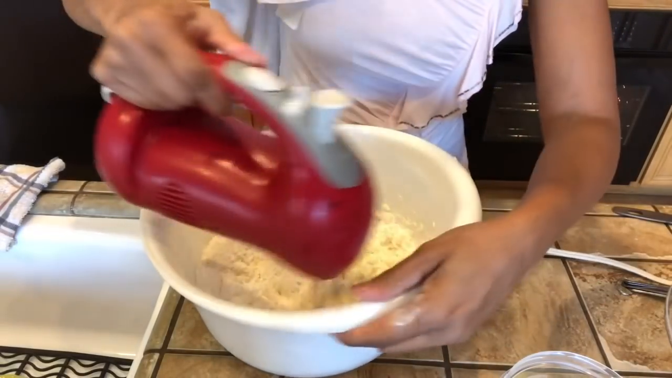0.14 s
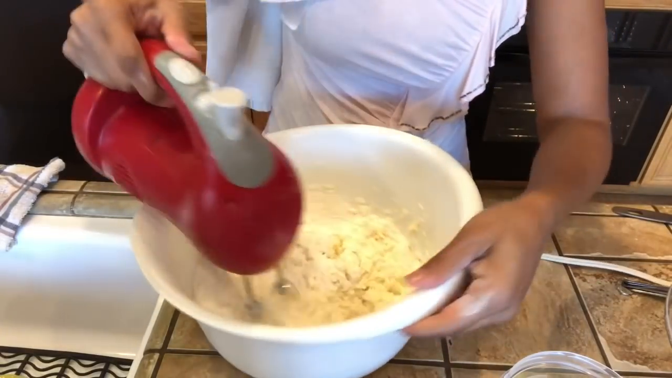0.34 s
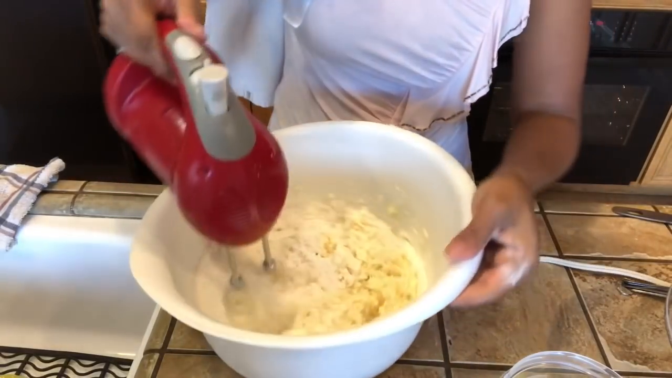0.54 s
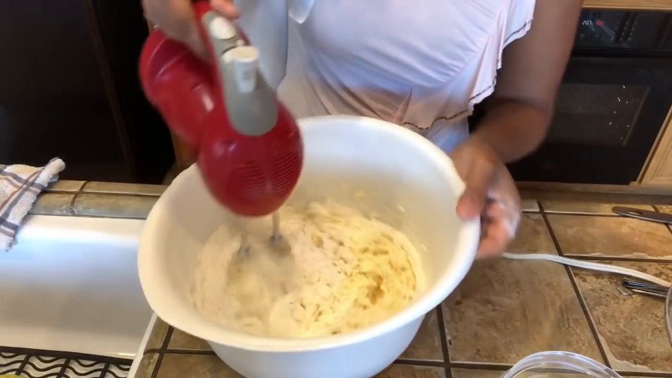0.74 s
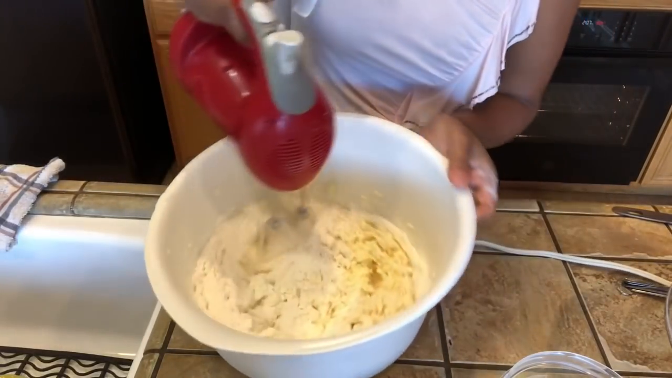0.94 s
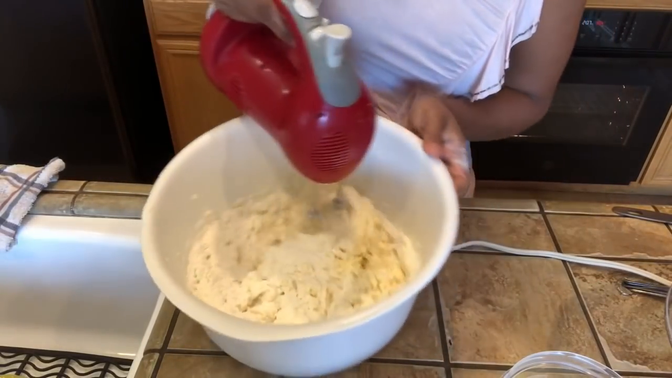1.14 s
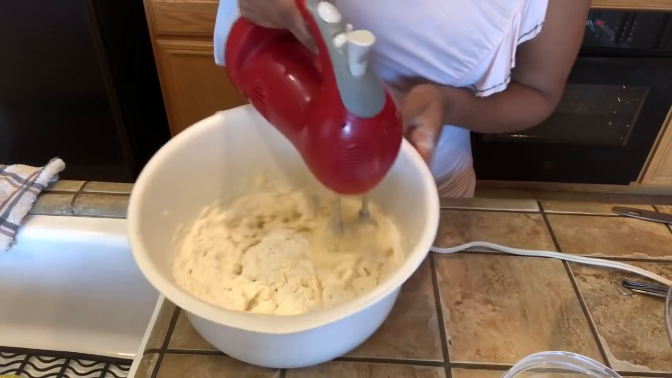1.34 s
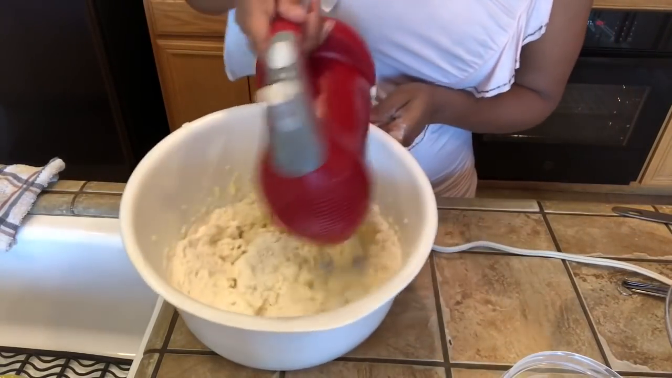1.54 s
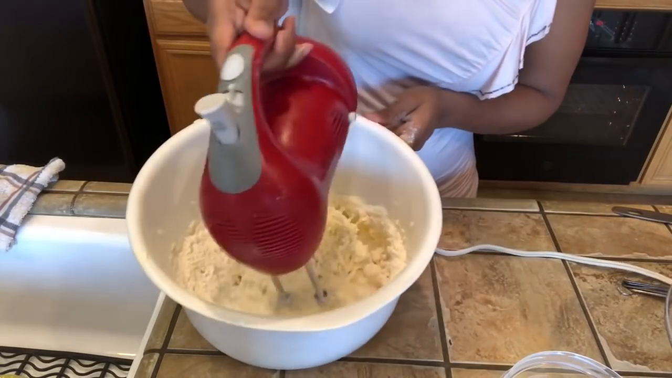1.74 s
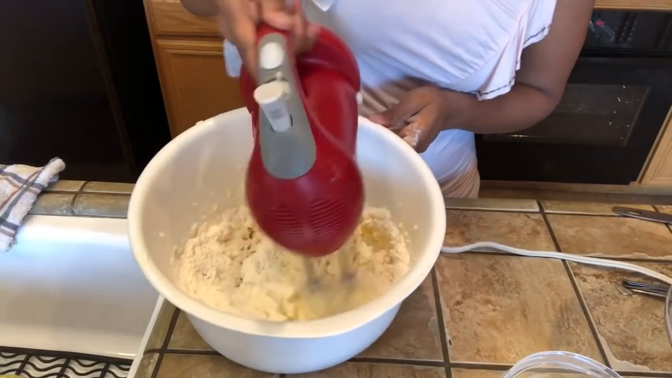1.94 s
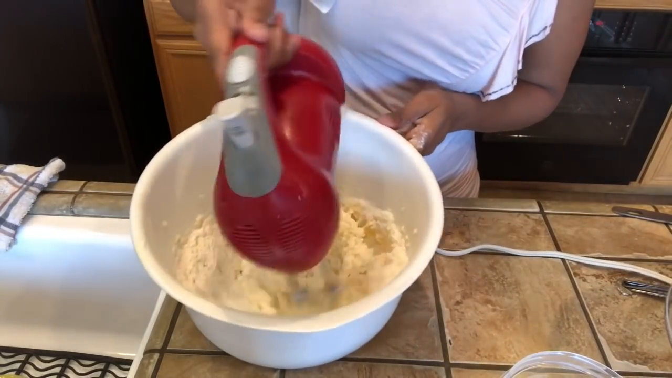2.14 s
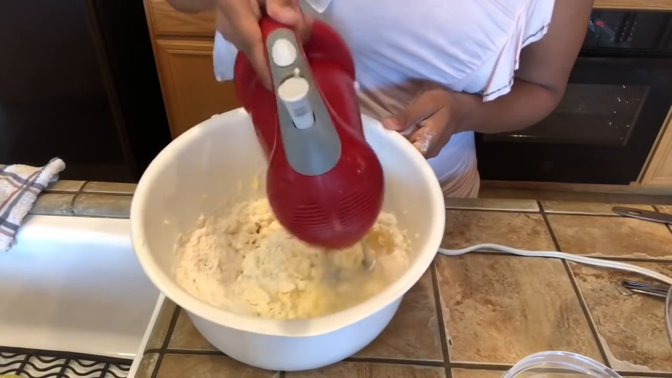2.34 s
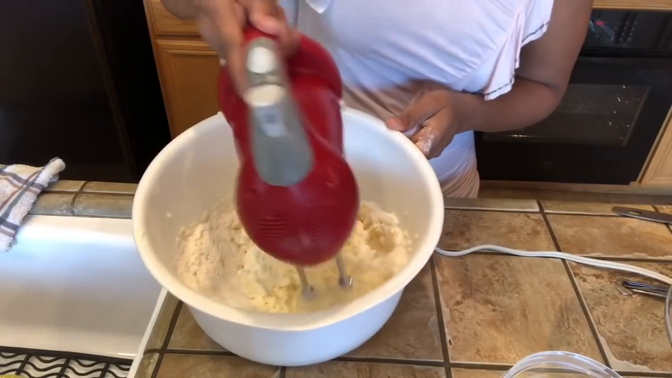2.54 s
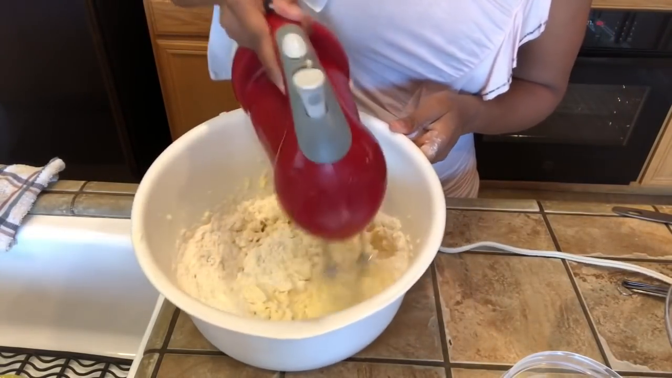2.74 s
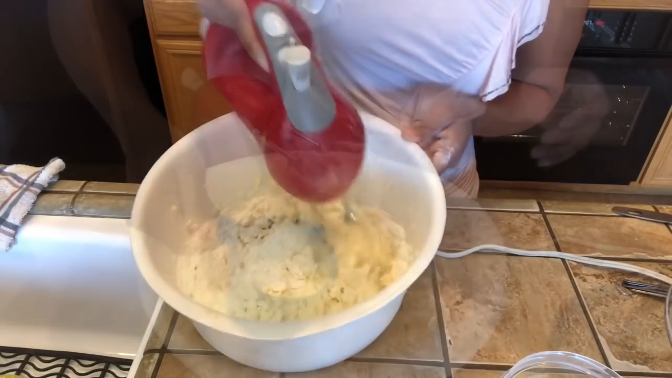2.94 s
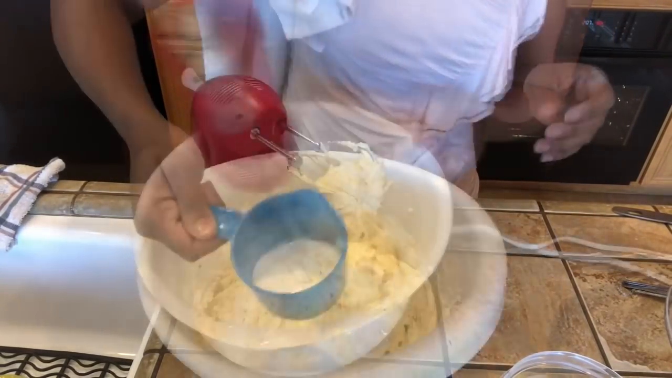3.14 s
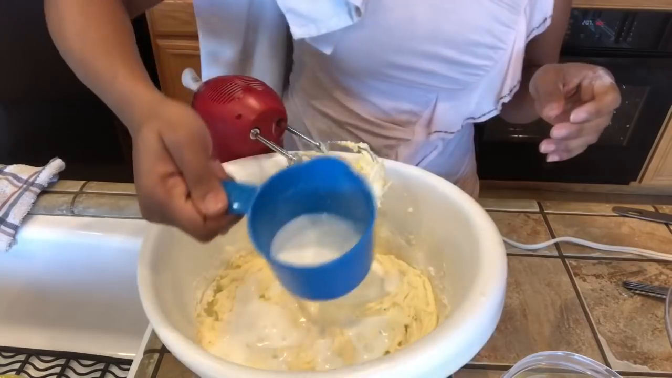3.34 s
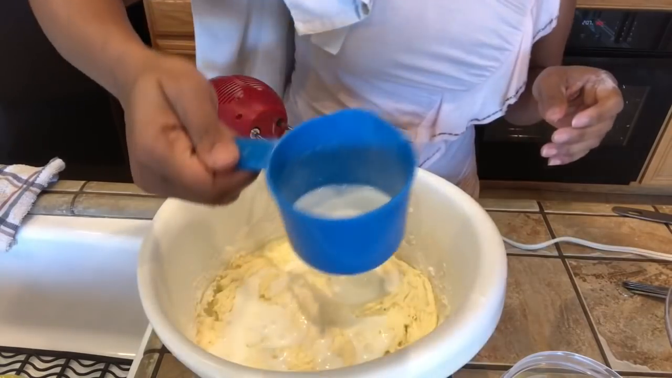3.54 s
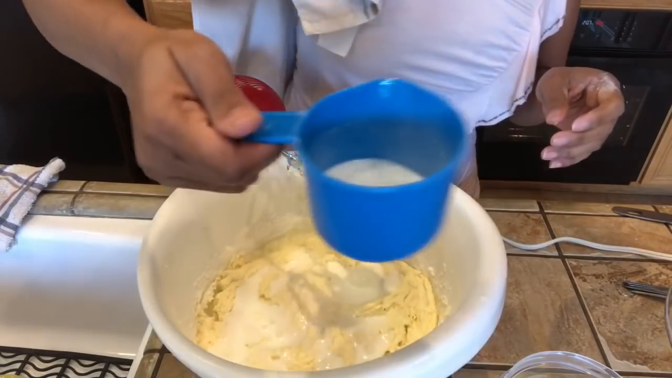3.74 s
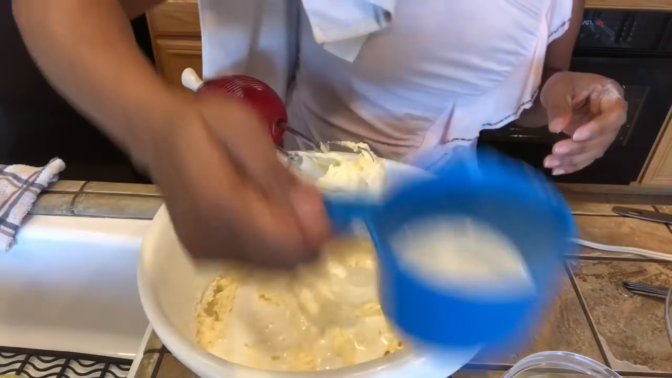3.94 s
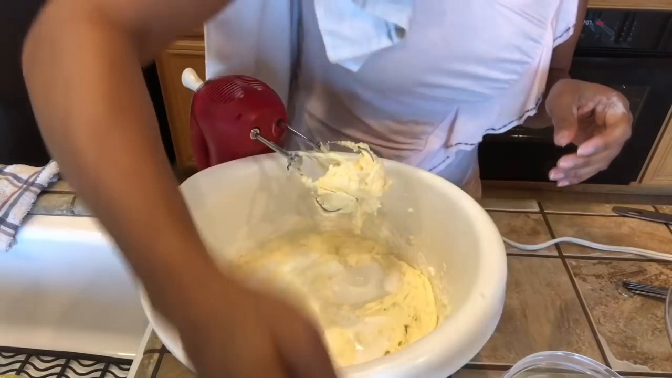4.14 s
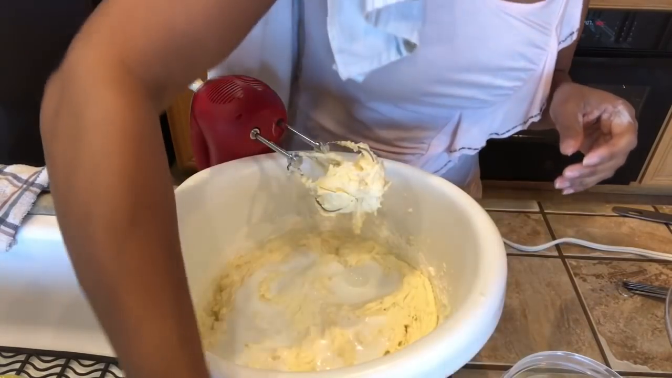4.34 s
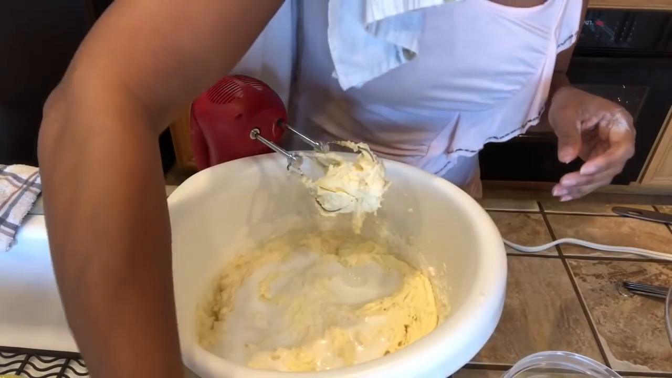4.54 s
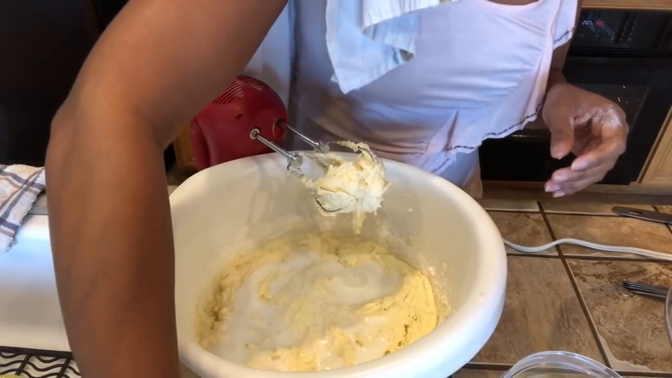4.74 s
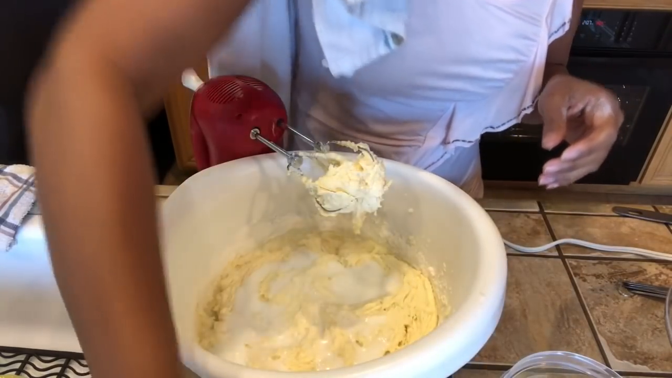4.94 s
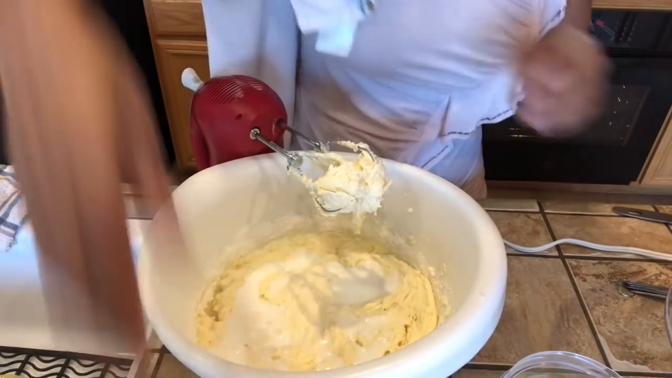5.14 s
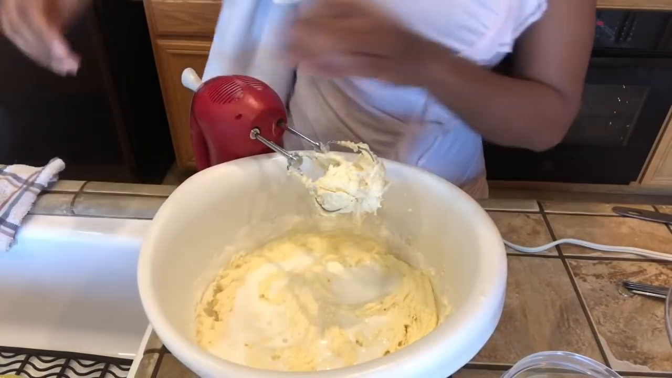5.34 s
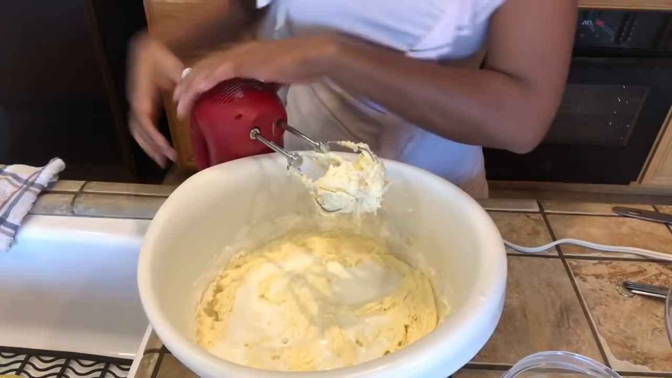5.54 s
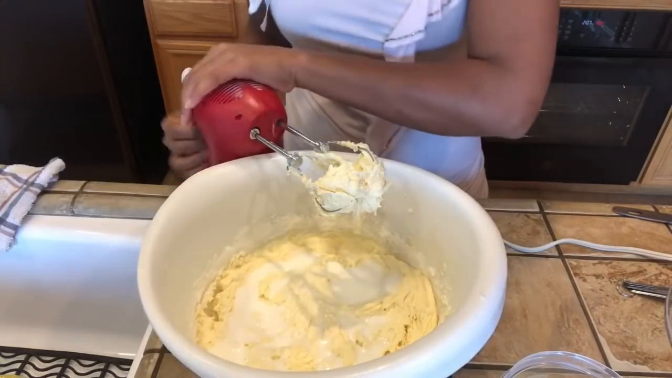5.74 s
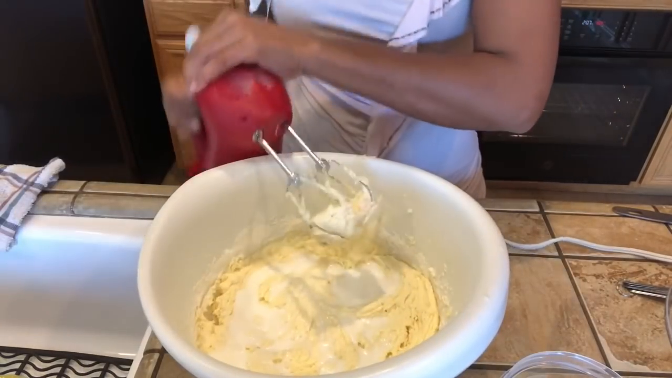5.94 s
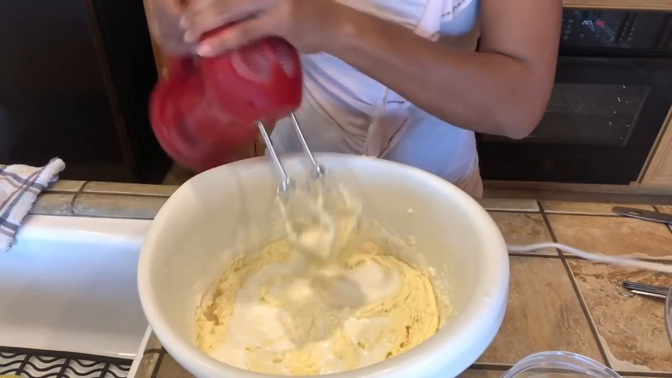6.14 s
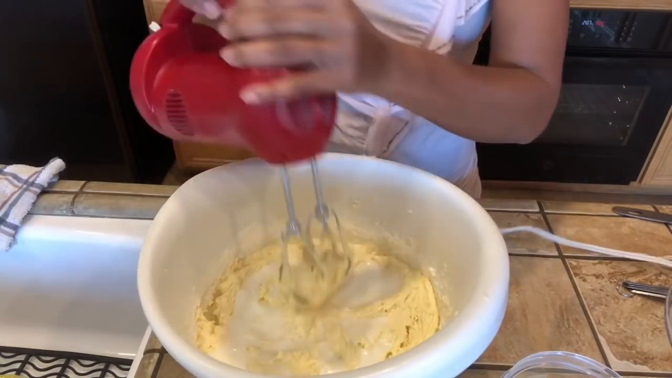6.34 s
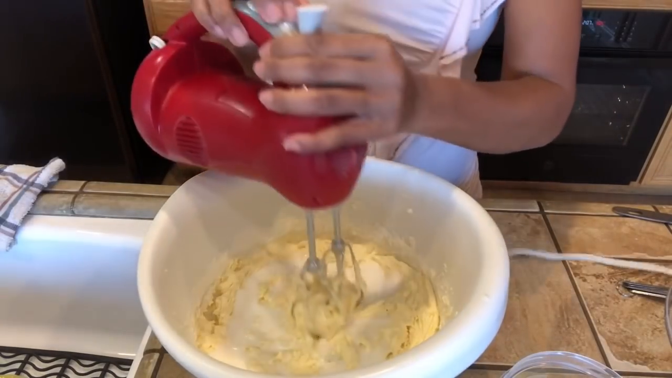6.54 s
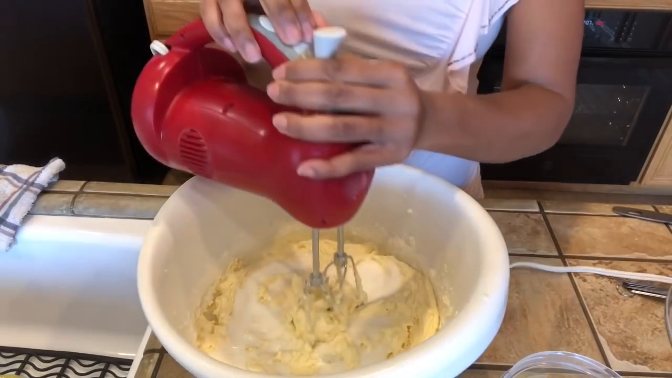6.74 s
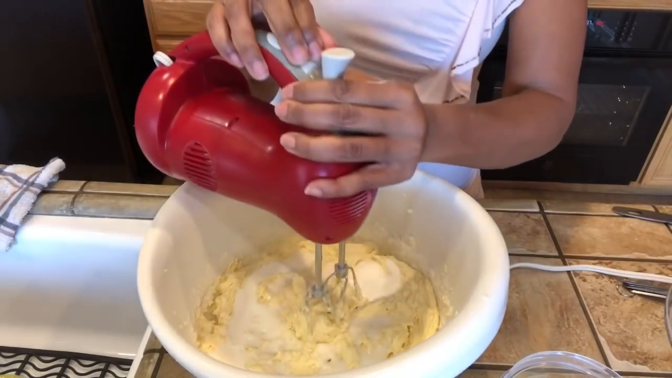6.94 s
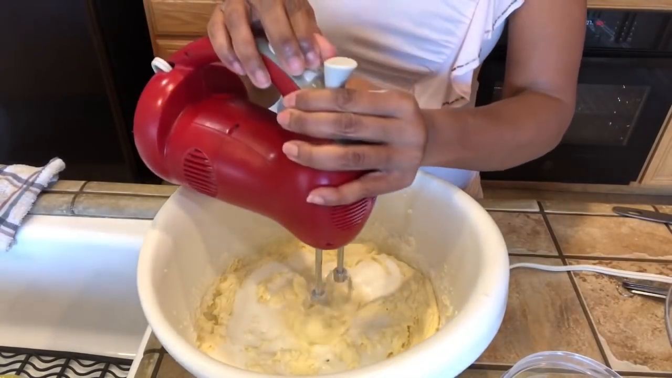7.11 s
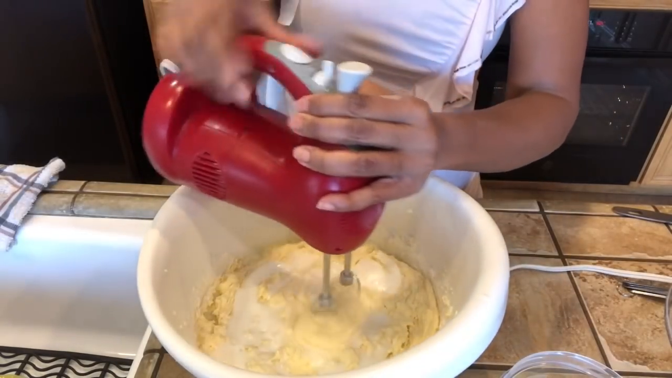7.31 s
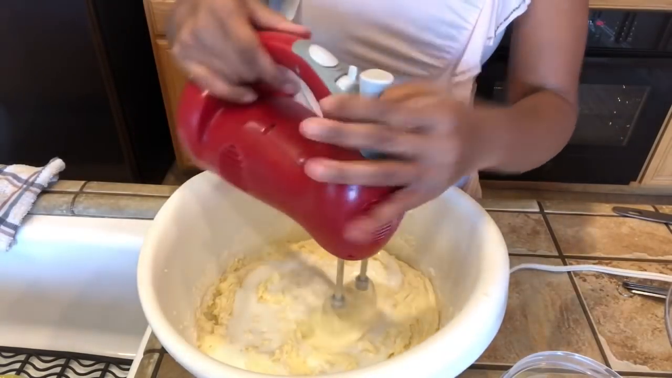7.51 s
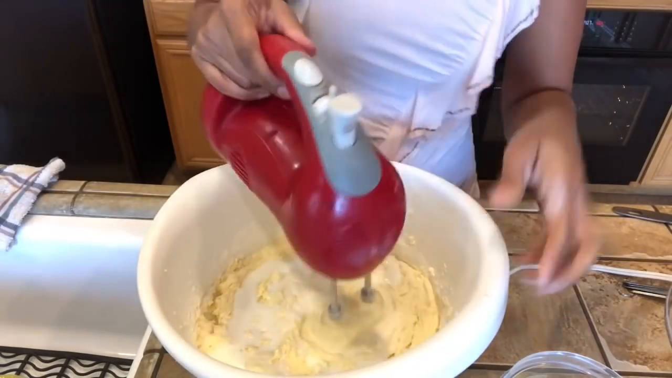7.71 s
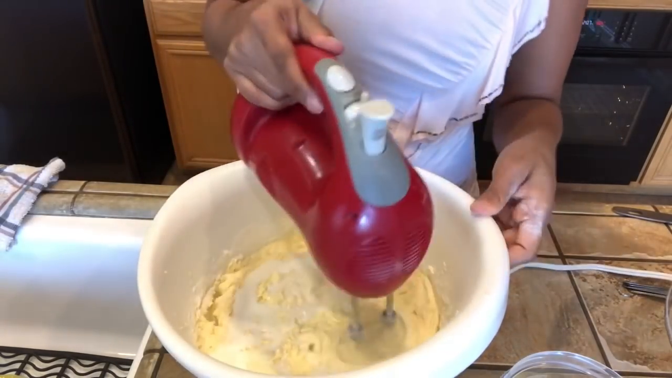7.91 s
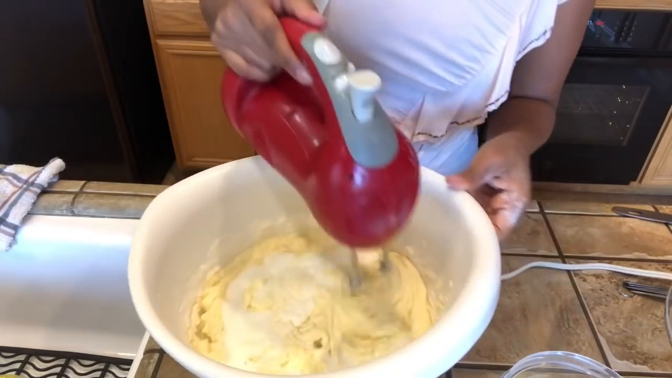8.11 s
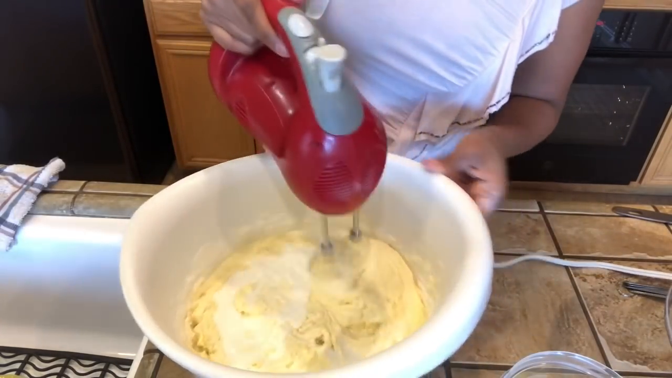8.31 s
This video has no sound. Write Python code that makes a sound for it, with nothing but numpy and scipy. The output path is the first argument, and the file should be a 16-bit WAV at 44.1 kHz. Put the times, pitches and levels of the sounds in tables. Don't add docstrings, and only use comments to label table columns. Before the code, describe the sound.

An electric hand mixer whines and buzzes through batter, knocks the bowl and fades; after small taps it switches on and revs up again.

```python
import sys
import numpy as np
from scipy import signal
from scipy.fft import rfft, irfft
from scipy.io import wavfile
from scipy.ndimage import uniform_filter1d

SR = 44100
rng = np.random.default_rng(int(sys.argv[2]) if len(sys.argv) > 2 else 0)


def convert_level_to_amplitude(level_db):
    exponent = np.asarray(level_db, float) / 20
    return 10 ** exponent


def int16_out(signal):
    q = np.round(np.clip(np.atleast_2d(signal).T, -1, 1) * 32767)
    wavfile.write(sys.argv[1], SR, q.astype(np.int16))


N = 369116
TIME = np.arange(N) / SR
HZ = np.arange(N // 2 + 1) * SR / N

# (frequency [Hz], level [dB per Hz])
ROOM_AIR = [(25, -28), (45, -2), (70, 1), (150, 4), (250, 4), (500, 1), (1000, -6), (2000, -12),
            (4000, -15), (7800, -19), (8300, -23.5), (12000, -25.5), (15500, -28)]
# (frequency [Hz], level [dB rms])
FRIDGE_HUM = [(118.6, -52.5), (241, -60.5), (360, -57.5), (511, -65), (1050, -67)]
ROOM_AIR_DB = -50.5
ROOM_T60_S, ROOM_DB = 0.71, -20

MAINS_HZ = 60.0
SLOT = 6
# (first run [s], second run [s])
PUSH_S = (.004, .0058)
SHELL_TILT = (.5, .15)
IDLE_EFFORT = (.17, .36)
LEAN = (.2, .06)
SLOT_ORDERS = (3, 9, 12, 15, 16, 18, 24, 28)
# (level [dB re fan], ..)
SLOT_LEVELS = [-2, -9, -5, -17, -12, -4.5, -6.5, -14]
# (order [shaft multiple], level [dB re shaft tone])
FAN_ORDERS = [(2, -12), (3, -15), (4, -13), (7, -11), (8, -21), (9, -17), (12, -15), (16, -16), (21, -22),
              (34, -27)]
# (order [mains multiple], level [dB re fan])
MAINS_BUZZ = [(1, -28), (2, -24.5), (3, -23.5), (4, -20.5), (5, -23), (7, -30), (8, -12), (12, -37)]
# (frequency [Hz], width [Hz], level [dB])
SHELL_MODES = [(977, 43, 14), (1432, 38, 10.5), (2304, 66, 17), (3050, 45, 6), (4140, 720, -2.5),
               (7540, 100, -5), (12050, 1000, 9.5)]
# (frequency [Hz], level [dB per Hz])
CHURN_NOISE = [(18, -63), (30, -2), (108, -12.5), (300, -7.5), (361, -5.5), (411, 0.5), (625, -6),
               (926, -3), (1270, -5), (1880, -5), (2250, -2.5), (2550, -3.5), (2780, -5.5), (3100, -6),
               (4340, -9.5), (12000, -27), (15600, -32.5)]
# (frequency [Hz], half width [Hz], level [dB])
VENT_SLOTS = [(3110, 110, -20.5), (4350, 290, -10.5), (7500, 200, -16), (12300, 300, -24)]

# (time [s], nearness [dB], vent turned to the microphone [dB], shell shake [dB])
STIRRING_PATH = [(0, -27, 5.5, 1), (.22, -26.5, 6, -2), (.38, -27, 6.5, 0), (.46, -28, 0.5, 1.5),
                 (.7, -28.5, 1, 0), (.95, -29.5, 5, -1.5), (1.2, -29, 6.5, 2.5), (1.44, -30, 0.5, -3.5),
                 (1.6, -29.5, -3, 1), (1.86, -29.5, 1, -5), (2.02, -29.5, 3, 4.5), (2.241, -29.5, 0.5, 1.5),
                 (2.52, -27.5, 7.5, 4), (2.709, -28.5, 1, -1.5), (2.809, -28, 4.5, 5),
                 (2.93, -27.5, 4.5, 3), (3.06, -28.5, 6, 4), (3.3, -28, -3.5, 2.5)]
# (time [s], shaft speed [Hz])
STIRRING_SPEED = [(0, 366), (.07, 363.8), (.22, 364.8), (.44, 361.3), (.66, 366), (.77, 363.8), (.92, 368),
                  (1.35, 355), (1.45, 348.5), (1.66, 347.8), (1.79, 342.5), (2.04, 358.5), (2.23, 352.3),
                  (2.51, 370.5), (2.68, 361.3), (2.89, 366.2), (3.1, 360.5), (3.36, 356.5)]
STIRRING_LAYERS = {"top": -5.5, "gears": -1.02, "bowl": -2.5, "shaft": -4.5}
# (start [s], end [s])
FADE_S = (2.743, 3.329)
FREE_HZ, SHAKE_DB_PER_HZ, DIG_DB_PER_HZ = 362.6, 0.2628, 0.23
THROB = 0.054
SCRAPE_S, SCRAPE_SHARE = 0.026, 0.36

# (middle [s], half length [s], pitch [Hz], level [dB])
DRAG_SWELLS = [(.1, .03, 1650, -32), (.27, .04, 1650, -34), (1.49, 0.021, 1750, -30),
               (1.727, .03, 1650, -29), (1.857, .035, 1600, -29.5), (1.4, 0.023, 500, -33),
               (2.103, 0.027, 1550, -30.5), (2.18, 0.028, 520, -24), (2.622, 0.052, 1520, -30),
               (2.617, .03, 780, -32), (7.56, 0.021, 340, -30), (1.13, 0.48, 100, -48.5),
               (2.8, .07, 70, -48), (7.35, .15, 75, -53), (8.12, .08, 520, -34.5), (7.115, .06, 492, -29),
               (7.747, .03, 1850, -33), (7.72, .22, 980, -32), (1.65, .2, 2120, -33), (5.86, .05, 65, -52),
               (.035, .012, 900, -27), (.095, .012, 2700, -27)]
# (low groans of the bowl [Hz], high wires [Hz])
DRAG_WIDTH_HZ = (45, 230)
# (time [s], peak [dB], ring [Hz], crack [dB re peak], scrape [dB])
BOWL_BUMPS = [(0.113, -10, 380, 1, -2.5), (.175, -23, 400, 5, -2), (.226, -22, 440, 14, 0.5),
              (.338, -24, 400, 0, 1), (0.567, -33, 400, 5, 1), (1.103, -24.5, 360, -14, -0.5),
              (1.19, -10.5, 360, -17, 3), (1.286, -22, 400, 0, 3.5), (1.389, -19, 526, -10, 6),
              (1.49, -16, 351, -16, 0.5), (1.509, -19, 900, -14, 6), (1.618, -16, 347, 1.5, 3),
              (1.708, -17.5, 347, 5, 7.5), (1.842, -11, 507, -4, 3), (2.1, -31, 355.3, -14, 6),
              (2.164, -12, 513, 1, 6), (2.183, -17, 355, -12, 4.5), (2.222, -24, 400, 7, 2),
              (2.308, -21, 350, -12, 1), (2.436, -20, 400, 4, 0), (2.52, -14, 366, -3, 1.5),
              (7.555, -15, 416, -17, 1), (8.197, -16, 433, -3, -1.5), (8.32, -22, 400, -8, 2.5)]
# (time [s], peak [dB], first pitch [Hz], last pitch [Hz], cup ring [dB re peak])
BOWL_BLOWS = [
    (2.7463, 0, 1650, 300, -30),
    (2.7545, -24, 240, 140, -40),
]
CHIRP_CYCLES = 4.8

# (middle [s], half length [s], hiss [dB], body [dB])
HAND_STROKES = [(3.806, 0.23, -70, -45), (5.554, 0.036, -49, -58), (5.667, 0.094, -49.5, -48),
                (5.782, 0.05, -53, -34.5), (6.12, 0.044, -60, -46), (6.203, .05, -52, -58),
                (6.45, 0.19, -59, -45.5), (6.61, 0.015, -49, -54), (6.684, 0.044, -64, -45),
                (6.8, 0.1, -64, -55), (6.983, 0.032, -62, -37)]
# (time [s], peak [dB], first pitch [Hz], last pitch [Hz], cup ring [dB re peak])
CUP_BLOWS = [
    (4.5296, -14, 1450, 500, -3),
    (4.645, -27, 1450, 600, -8),
    (4.7615, -25.5, 1400, 850, -3),
    (4.771, -34, 1300, 1200, 0),
    (4.78, -36, 560, 420, -30),
    (5.80, -45, 200, 80, -40),
]
# (frequency [Hz], level [dB re blow], t60 [s])
CUP_MODES = [(2100, -14, 0.011), (3160, -18.5, 0.022), (5000, -25, .02), (1239, -9, 0.059)]
# (time [s], peak [dB], pitch [Hz], t60 [s])
SMALL_PINGS = [(5.708, -42, 200, .03), (5.723, -39, 520, .03), (5.765, -35, 3380, .03),
               (5.775, -34, 380, .03), (5.778, -55, 3400, .2), (4.557, -38, 1250, .03),
               (4.542, -33, 560, .04)]
# (time [s], peak [dB], upper ring [dB re peak], crack [dB re peak])
FINGER_TICKS = [(4.797, -44, -16, -2), (5.718, -43, -10, -3), (5.767, -28.5, -20, -9), (6.051, -47, 7, 1),
                (6.092, -27.5, -4, -21), (6.2333, -32.5, -19, -15), (6.41, -44, -15, -12),
                (6.444, -49, -7, -7), (6.474, -46, -3, -6), (6.501, -44, -9, -4.5), (6.579, -54, -2, 3),
                (6.607, -48, -8, 14), (6.621, -49, -10, 1), (6.632, -55, -5, 12), (6.664, -42, 0, -10),
                (6.685, -52, 3, 6), (6.702, -46, 6, -6), (6.715, -38, 1, -7), (6.742, -34.5, 0, -13),
                (6.766, -36, -1, -12), (6.785, -38, -1, -12), (6.807, -34.5, -2, -15), (6.86, -35, 5, -11),
                (6.887, -43, 1, -7), (6.899, -42, -3, -6), (6.961, -38, 6, -6), (6.975, -42, 5, -4),
                (6.994, -35, 6, -11), (6.987, -29, 0, -3), (7.002, -17.5, 0, -6)]
# (time [s], peak [dB], ring [Hz], upper ring [dB], crack [Hz], crack [dB])
FINGERNAIL = (6.655, -47, 850, 0, 10300, 8)

SWITCH_ON_S, TOP_HZ = 7.001, 340
# (time [s], shaft speed [Hz])
SPIN_UP = [(7.0, 38), (7.068, 98), (7.15, 167), (7.21, 210), (7.3, 247), (7.4, 278), (7.57, 304),
           (7.81, 325), (8.1, 333), (8.37, 347)]
# (time [s], whine [dB])
VENT_SWING = [(7.0, -6), (7.06, -5), (7.11, 0.5), (7.15, -4), (7.19, 2), (7.25, 2), (7.31, -9), (7.55, 0),
              (7.8, -2), (7.98, 5), (8.15, -3), (8.37, 1)]
RESTART_LAYERS = {"top": -0.5, "gears": -30.5, "bowl": -28.5, "shaft": -33.5, "whine": -32.5}
JOLT_DB = {"fan": -34.5, "top": -2.5, "gears": -25.5, "bowl": -26}
# (frequency [Hz], width [Hz], depth [0-1])
GRIP_DIPS = [(1330, 130, 0.29), (3450, 91, 0.36), (6800, 220, 0.32)]
JOLT_ATTACK_S, BOWL_LURCH_S = 0.047, 0.07
FAN_DB, FAN_POWER, SPARK_DB = -32.5, 3.7, -45
GEAR_POWER, SHAKE_POWER = 0.83, 4.6
INRUSH_DB, INRUSH_S, INRUSH_THROB = 11, 0.14, 2.6
STALL_LAG_S, STALL_S = .004, .08
FLARE_DB, FLARE_WIDTH_HZ = 14.5, 150
SPARK_TOP_DB, SPARK_TOP_S = 2, 0.24


def unit(x):
    return x / np.sqrt(np.mean(x ** 2))


def shape(x, gain):
    return irfft(rfft(x) * gain, N)


def colour(points):
    hz, db = np.transpose(points)
    return convert_level_to_amplitude(np.interp(np.log(HZ + 1), np.log(hz), db))


def band(lo_hz, hi_hz):
    low_edge = (HZ / lo_hz) ** 6 / (1 + (HZ / lo_hz) ** 6)
    return np.sqrt(low_edge / (1 + (HZ / hi_hz) ** 6))


def walk(rate):
    k = int(SR / rate)
    held = np.repeat(rng.standard_normal(N // k + 1), k)
    return unit(uniform_filter1d(uniform_filter1d(held, k), k)[:N])


def swell(s, half_s):
    return np.exp(-((TIME - s) / half_s) ** 2)


def decay(t, t60):
    return np.exp(-np.log(1000) * t / t60)


def both(*db):
    return 10 * np.log10(sum(convert_level_to_amplitude(d) ** 2 for d in db))


def add(out, s, x):
    i = int(s * SR)
    out[i:i + len(x)] += x[:N - i]


def kitchen():
    air = unit(shape(rng.standard_normal(N), colour(ROOM_AIR)))
    out = convert_level_to_amplitude(ROOM_AIR_DB + .3 * walk(3)) * air
    for hz, db in FRIDGE_HUM:
        phase = 2 * np.pi * np.cumsum(hz * (1 + 0.00801 * walk(8))) / SR
        out += convert_level_to_amplitude(db + 0.5 + walk(13)) * np.sin(phase)
    return out


def housing(hz):
    return 1 + sum(convert_level_to_amplitude(db) / (1 + 1j * (hz ** 2 - f ** 2) / (w * np.maximum(hz, 1)))
                   for f, w, db in SHELL_MODES)


def slot_whine(twist, current, whine_db, tilt):
    whine = shape(current * np.sin(SLOT * twist + .42 * walk(300)), housing(HZ) ** tilt)
    steady = np.sqrt(uniform_filter1d(whine ** 2, 2205) + 1e-9)
    return whine * convert_level_to_amplitude(whine_db - 3.0 + 1.1 * walk(14)) / steady


def upper_whines(running, hz, turn, twist, mains, current, fan_db, idle):
    effort = np.clip(uniform_filter1d(np.gradient(hz) * SR, 4410) / 230, idle, 1.4)
    shell = np.abs(housing(HZ))
    lines = 0
    for k, db in zip(SLOT_ORDERS, SLOT_LEVELS):
        phase = k * turn + .5 * np.sin(mains) + (1 + k / 24) * walk(150)
        lines = lines + convert_level_to_amplitude(db + 2 * walk(20)) * np.sin(phase)
    brush = shape(np.sin(8 * twist + .6 * walk(200)) * effort, shell ** .45)
    lines = lines + convert_level_to_amplitude(-4.5) * brush
    return shape(running * convert_level_to_amplitude(fan_db) * effort * current * lines, shell ** .65)


def shaft_tones(turn):
    out = convert_level_to_amplitude(1.24 * walk(14)) * np.sin(turn)
    for k, db in FAN_ORDERS:
        out = out + convert_level_to_amplitude(db + 2.5 * walk(22)) * np.sin(k * turn + (0.76 + k / 30) * walk(60))
    return out


def churn(push, fan_db, top_db, gears_db, bowl_db, throb, tilt):
    grain = convert_level_to_amplitude(1.06 * walk(400) + 0.63 * walk(30))
    gain = colour(CHURN_NOISE) * np.abs(housing(HZ)) ** (.2 + tilt / 4)
    noise = shape(rng.standard_normal(N) * grain, gain)
    layers = [(25, 54, fan_db - 50, 0.26),
              (114, 655, bowl_db - 4.0, 0.13),
              (746, 1880, gears_db + .5, 0.3),
              (2740, 7100, fan_db - 5.5, 0.87),
              (5880, 28000, fan_db + top_db - .5, 0.31)]
    out = 0
    for lo_hz, hi_hz, db, share in layers:
        depth = np.clip(share * throb, 0, 5)
        squeeze = np.exp(depth * push) / np.sqrt(np.i0(2 * depth))
        level = convert_level_to_amplitude(db + 0.79 * walk(20) + 0.45 * walk(5))
        out = out + level * unit(shape(noise, band(lo_hz, hi_hz))) * squeeze
    return out


def mixer(run, running, hz, shaft_db, whine_db, fan_db, top_db, gears_db, bowl_db, throb, push_s):
    turn = 2 * np.pi * np.cumsum(hz * (1 + 0.000986 * walk(25))) / SR
    mains = 2 * np.pi * MAINS_HZ * (TIME - push_s)
    push = np.cos(mains) - 0.3 * np.sin(2 * mains)
    current = unit(np.exp(1.2 * push))
    twist = turn + LEAN[run] * np.sin(mains)
    whine = slot_whine(twist, current, whine_db, SHELL_TILT[run])
    upper = upper_whines(running, hz, turn, twist, mains, current, fan_db, IDLE_EFFORT[run])
    shaft = convert_level_to_amplitude(shaft_db + 1.5) * shaft_tones(turn)
    buzz = sum(convert_level_to_amplitude(db + 2 * walk(4.9)) * np.sin(k * mains + k) for k, db in MAINS_BUZZ)
    noise = churn(push, fan_db, top_db, gears_db, bowl_db, throb, SHELL_TILT[run])
    return running * (whine + upper + shaft + convert_level_to_amplitude(fan_db) * buzz + noise)


def vents(db):
    peaks = sum(1 / (1 + ((HZ - hz) / width) ** 2) * convert_level_to_amplitude(band_db) / np.sqrt(width)
                for hz, width, band_db in VENT_SLOTS)
    return convert_level_to_amplitude(db + 1.8 * walk(6)) * unit(shape(rng.standard_normal(N), peaks))


def scrapes():
    return SCRAPE_SHARE * sum(row[4] * swell(row[0], SCRAPE_S) for row in BOWL_BUMPS)


def stirring():
    s, *columns = np.transpose(STIRRING_PATH)
    near_db, vent_db, shake_db = [np.interp(TIME, s, c) for c in columns]
    hz = uniform_filter1d(np.interp(TIME, *np.transpose(STIRRING_SPEED)), size=2205)
    left = np.clip((FADE_S[1] - TIME) / (FADE_S[1] - FADE_S[0]), 1e-4, 1)
    near_db = near_db + 20 * np.log10(left)
    running, scrape_db, layer = TIME < FADE_S[1], scrapes(), STIRRING_LAYERS
    slowed_hz = FREE_HZ - hz
    fan_db = near_db + scrape_db
    motor = mixer(
        0, running, hz,
        shaft_db=near_db + layer["shaft"] + shake_db + SHAKE_DB_PER_HZ * slowed_hz,
        whine_db=near_db + vent_db,
        fan_db=fan_db,
        top_db=layer["top"] - 0.42 * scrape_db,
        gears_db=fan_db + layer["gears"],
        bowl_db=fan_db + layer["bowl"] + DIG_DB_PER_HZ * slowed_hz + 0.25 * scrape_db,
        throb=THROB, push_s=PUSH_S[0])
    return running * vents(near_db + 0.49 * vent_db - 16.0) + motor


def drags():
    low, high = (unit(shape(rng.standard_normal(N), 1 / (1 + (HZ / width) ** 4)))
                 for width in DRAG_WIDTH_HZ)
    out = np.zeros(N)
    for s, half_s, hz, db in DRAG_SWELLS:
        noise = low if hz < 600 else high
        out += noise * convert_level_to_amplitude(db + 4) * swell(s, half_s) * np.sin(2 * np.pi * hz * TIME)
    return out


def rings(table, upper_hz, t60, crack_s):
    out, t = np.zeros(N), TIME[:4000]
    for s, db, hz, upper_db, crack_hz, crack_db in table:
        this_upper_hz = upper_hz * (1 + 0.077 * rng.standard_normal())
        upper = convert_level_to_amplitude(upper_db) * np.sin(2 * np.pi * this_upper_hz * t) * np.exp(-t / 0.0049)
        ring = np.sin(2 * np.pi * hz * t) + upper
        ring = ring * (1 + 0.83 * uniform_filter1d(rng.standard_normal(len(t)), size=36) * 6)
        ring = ring * decay(t, t60) * (1 - np.exp(-t / 0.00051))
        spread = uniform_filter1d(rng.standard_normal(len(t)), size=24) * 5
        crack = convert_level_to_amplitude(crack_db) * spread * np.sin(2 * np.pi * crack_hz * t) * np.exp(-t / crack_s)
        add(out, s, convert_level_to_amplitude(db - 4.0) * (ring + crack))
    no_bass = signal.butter(2, 170, "high", fs=SR, output="sos")
    return signal.sosfilt(no_bass, out)


def bumps():
    table = [(s, db, hz, 4, 3696, crack_db) for s, db, hz, crack_db, _ in BOWL_BUMPS]
    return rings(table, upper_hz=980, t60=0.021, crack_s=0.0026)


def thuds(table, tail_db):
    out, t = np.zeros(N), TIME[:9000]
    dull = unit(shape(rng.standard_normal(N), band(220, 960) ** 2 / (HZ + 500)))
    cup = sum(convert_level_to_amplitude(db) * np.sin(2 * np.pi * hz * t) * decay(t, t60) for hz, db, t60 in CUP_MODES)
    for s, db, first_hz, last_hz, cup_db in table:
        length = CHIRP_CYCLES / first_hz
        hz = last_hz + (first_hz - last_hz) * np.exp(-t / (.6 * length))
        envelope = (1 - np.exp(-t / .0007)) * np.exp(-(t / length / 1.3) ** 2)
        chirp = -np.sin(2 * np.pi * np.cumsum(hz) / SR) * envelope
        crack = 0.065 * uniform_filter1d(rng.standard_normal(len(t)), size=3) * np.exp(-t / 0.0013)
        rumble = dull[int(s * SR):][:len(t)] * (1 - np.exp(-(t / 0.011) ** 2)) * np.exp(-t / 0.024)
        add(out, s, convert_level_to_amplitude(db) * (chirp + convert_level_to_amplitude(tail_db) * rumble - convert_level_to_amplitude(cup_db) * (cup + crack)))
    return out


def rustle():
    slips = rng.standard_normal(N) * convert_level_to_amplitude(2.3 * walk(150))
    hiss = unit(shape(slips, band(3600, 9400) / (HZ + 3000)))
    body = unit(shape(slips, band(110, 3800) / (HZ + 400)))
    return sum(swell(s, half_s) * (convert_level_to_amplitude(hiss_db - 9.5) * hiss + convert_level_to_amplitude(body_db - 10.5) * body)
               for s, half_s, hiss_db, body_db in HAND_STROKES)


def pings():
    out, t = np.zeros(N), TIME[:9000]
    for s, db, hz, t60 in SMALL_PINGS:
        add(out, s, convert_level_to_amplitude(db) * np.sin(2 * np.pi * hz * t) * decay(t, t60) * (1 - np.exp(-t / 0.0018)))
    return out


def ticks():
    table = []
    for s, db, upper_db, crack_db in FINGER_TICKS:
        ring_hz = 932 * (1 + 0.023 * rng.standard_normal())
        crack_hz = 3460 * (1 + 0.056 * rng.standard_normal())
        table.append((s, db, ring_hz, upper_db, crack_hz, crack_db))
    return rings(table + [FINGERNAIL], upper_hz=2160, t60=0.037, crack_s=0.0028)


def restart():
    hz = uniform_filter1d(np.interp(TIME, *np.transpose(SPIN_UP)), size=2205)
    since = np.maximum(TIME - SWITCH_ON_S, 1e-4)
    speed_db, scrape_db, layer = 20 * np.log10(hz / TOP_HZ), scrapes(), RESTART_LAYERS

    def jolt_db(peak_s):
        return 40 * np.log10(since / peak_s) + 20 / np.log(10) * (1 - (since / peak_s) ** 2)

    jolt = jolt_db(JOLT_ATTACK_S)
    inrush_db = INRUSH_DB * np.exp(-(since / INRUSH_S) ** 2)
    flare_db = FLARE_DB / (1 + ((SLOT * hz - SHELL_MODES[0][0]) / FLARE_WIDTH_HZ) ** 2)
    vent_db = np.interp(TIME, *np.transpose(VENT_SWING))
    onset_db = 20 * np.log10(np.minimum(since / 0.033, 1))
    gear_growth_db = GEAR_POWER * speed_db
    return mixer(
        1, TIME > SWITCH_ON_S, hz,
        shaft_db=layer["shaft"] + SHAKE_POWER * speed_db,
        whine_db=layer["whine"] + 0.12 * speed_db + inrush_db + vent_db + flare_db + onset_db,
        fan_db=both(FAN_DB + FAN_POWER * speed_db + scrape_db, JOLT_DB["fan"] + jolt, SPARK_DB),
        top_db=layer["top"] + SPARK_TOP_DB * swell(7.31, SPARK_TOP_S) + JOLT_DB["top"] * convert_level_to_amplitude(jolt),
        gears_db=both(layer["gears"] + gear_growth_db + scrape_db, JOLT_DB["gears"] + jolt),
        bowl_db=both(layer["bowl"] + gear_growth_db + 4.1 * scrape_db,
                     JOLT_DB["bowl"] + jolt_db(BOWL_LURCH_S)),
        throb=THROB + INRUSH_THROB * np.exp(-since / INRUSH_S),
        push_s=PUSH_S[1] + STALL_LAG_S * np.exp(-since / STALL_S))


def grip():
    return np.prod([1 - np.clip(depth, 0, .9) / (1 + ((HZ - hz) / width) ** 2)
                    for hz, width, depth in GRIP_DIPS], axis=0)


def tiles(hits):
    echo = shape(rng.standard_normal(N), band(150, 5000)) * decay(TIME, ROOM_T60_S) * (TIME > .004)
    return convert_level_to_amplitude(ROOM_DB) * shape(hits, rfft(echo / np.sqrt(np.sum(echo ** 2))))


def scene():
    hits = bumps() + thuds(BOWL_BLOWS, tail_db=-26) + thuds(CUP_BLOWS, tail_db=-12.5) + pings() + ticks()
    motor = stirring() + shape(restart(), grip())
    mono = kitchen() + motor + drags() + hits + tiles(hits) + rustle()
    return np.array([mono, mono])


def band_limit(x):
    return signal.sosfilt(signal.butter(12, 15800, fs=SR, output="sos"), x)


def record(dry):
    bass_cut = signal.butter(3, 48, "high", fs=SR, output="sos")
    treble_cut = signal.ellip(10, .2, 70, 15750, fs=SR, output="sos")
    mix = signal.sosfilt(np.vstack([bass_cut, treble_cut]), dry)
    return band_limit(mix)


dry = scene()
out = record(dry)
int16_out(out)
```